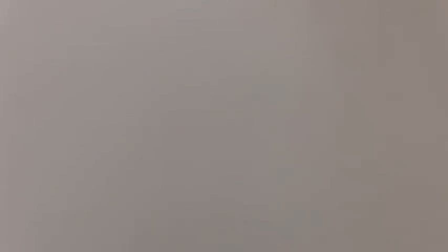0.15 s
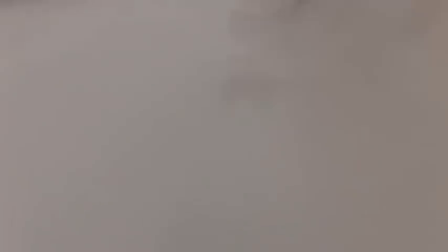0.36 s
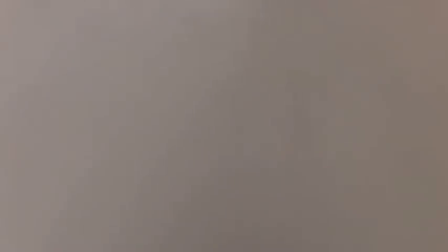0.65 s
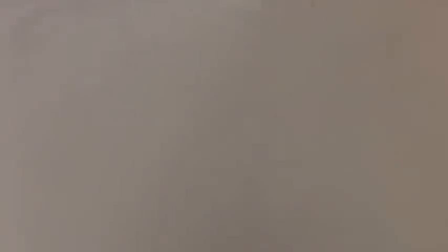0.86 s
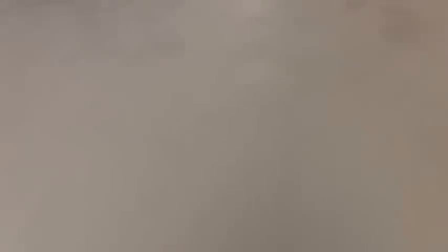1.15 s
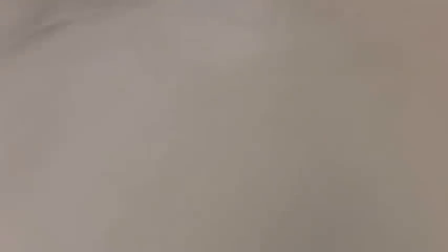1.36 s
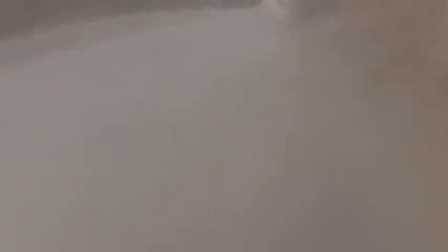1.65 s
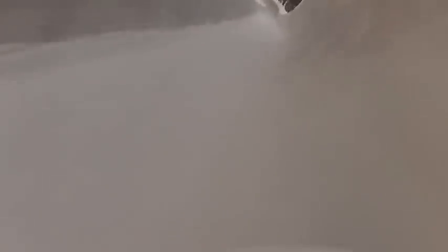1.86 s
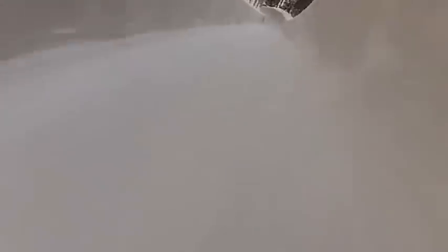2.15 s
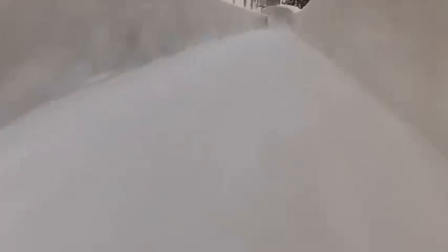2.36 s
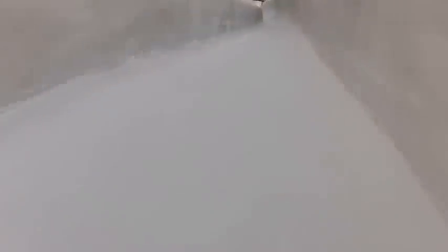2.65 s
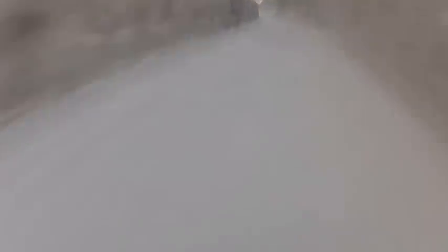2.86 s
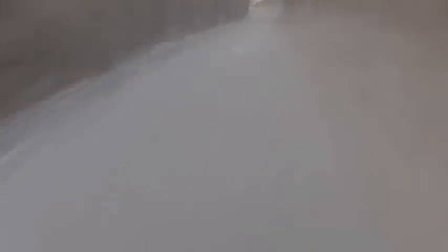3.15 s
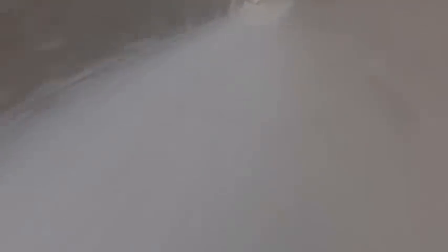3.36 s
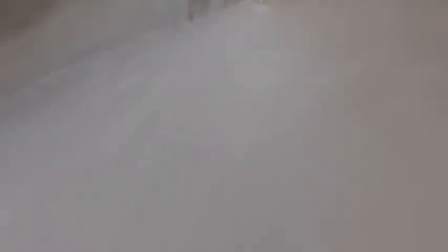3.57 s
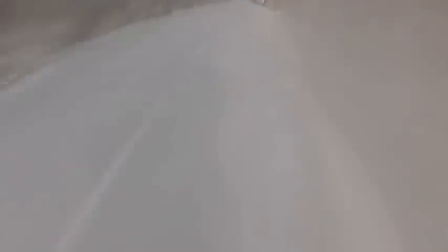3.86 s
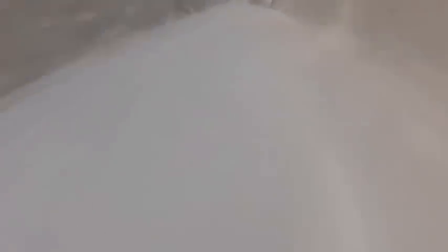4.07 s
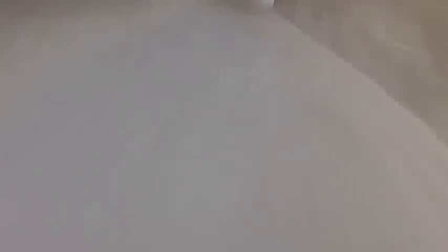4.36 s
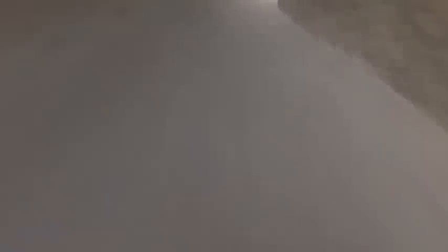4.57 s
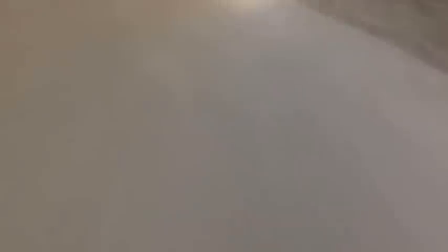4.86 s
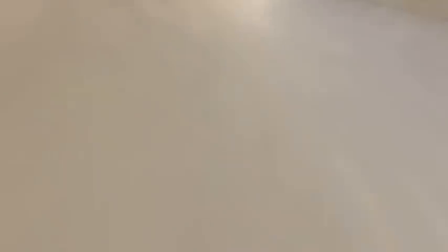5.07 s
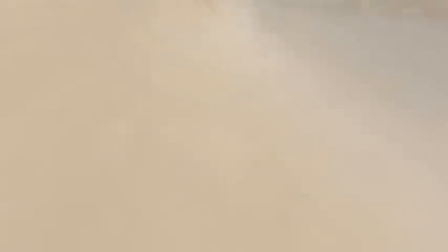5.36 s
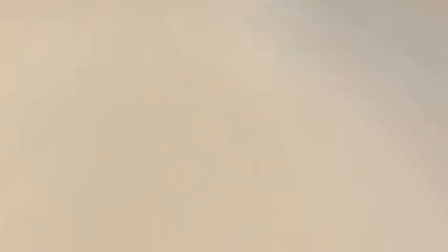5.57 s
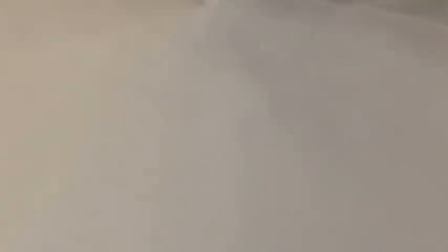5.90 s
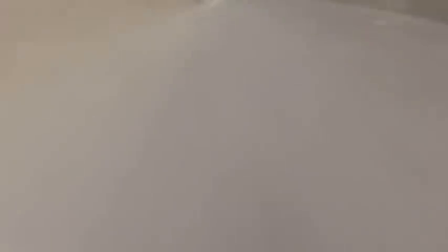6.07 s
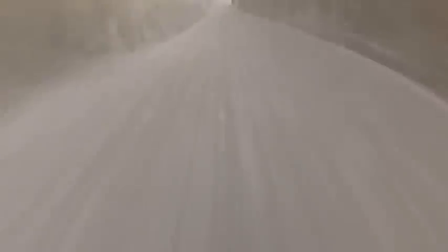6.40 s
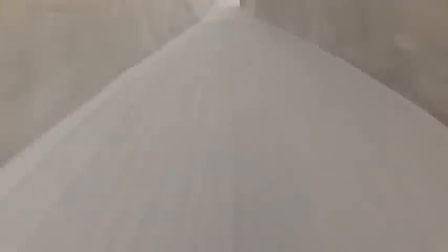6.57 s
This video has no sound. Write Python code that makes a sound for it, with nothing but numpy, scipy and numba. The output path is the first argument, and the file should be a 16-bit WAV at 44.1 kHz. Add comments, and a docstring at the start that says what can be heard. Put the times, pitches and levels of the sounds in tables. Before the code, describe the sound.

A sled runs fast on ice, heard dry and very close through its frame, centred. At 0 s a bump starts it, the scrape briefly held down, then loud: a dense, gritty, metallic rasp strongest around 2 kHz, with fluttering spray hiss. A double knock at 0.5 s has a very hard second hit; another hard thump lands at 1.0, a smaller one at 1.1. Deep rumble swells near 1.4, then knocks come at 1.7-1.8. A faint low groan passes around 2.2. From 2 to 5 s the scrape dominates, fullest near 3.8, with tiny bright ice ticks at 3.4, 4.5 and 6.2 and a weak bump at 4.2. Bumps return at 5.2, hard ones at 5.55-5.65, with groaning skids and the strongest rumble near 5.75. More thumps hit at 5.9, 6.2 and 6.4. The hardest blows distort and momentarily duck the scrape, which continues to the end at about 6.7.

```python
"""A bump and the harsh scrape of steel on ice open a sled run, taken by a camera fixed to the frame.
The runners crush ice grains and chatter, ringing the frame; skids in the turns make it groan.
Ruts make the shell rumble, ridges thump it and now and then a chip of ice ticks.
Everything arrives through the frame, alike in both channels.
The hardest thumps overload the camera, whose limiter ducks the scrape for a moment."""
import sys
import numpy as np
from scipy import signal
from scipy.fft import rfft, irfft
from scipy.io import wavfile
from scipy.ndimage import uniform_filter1d
from numba import njit

SR = 44100
rng = np.random.default_rng(int(sys.argv[2]) if len(sys.argv) > 2 else 0)


def store_pcm(level_fs):
    """Save levels as 16-bit WAV."""
    pcm = np.round(np.clip(level_fs, -1, 1) * 32767).astype(np.int16)
    wavfile.write(sys.argv[1], SR, np.atleast_2d(pcm).T)


N = 297234
T = np.arange(N) / SR
BINS = np.maximum(np.fft.rfftfreq(N, 1 / SR), 1)  # Hz, kept above zero

# broad colour of steel on ice: (frequency [Hz], level [dB])
STEEL_COLOUR = [(90, -25), (170, -13), (280, -12.5), (500, -14.5), (720, -19.5), (1050, -16.5),
                (1500, -8.5), (2100, -2.5), (2800, -7), (4200, -18.5), (5400, -20.5), (7500, -21),
                (9700, -18), (14500, -21.5)]
# resonances of runners and frame: (frequency [Hz], width [Hz], lift [dB])
FRAME_MODES = [(377, 71, 6.5), (909, 101, 8.5), (1275, 320, 8.5), (1780, 174, 3), (2265, 156, 3),
               (3133, 150, 4), (3710, 420, 5), (4510, 146, 6), (8310, 270, 5), (8970, 510, 4.5),
               (9780, 430, 6.5), (14300, 560, 6)]


def undb(db):
    """Decibels to gain."""
    return 10 ** (np.asarray(db) / 20)


def slope(points):
    """A (Hz, dB) outline on the frequency bins, straight over log frequency."""
    hz, db = np.transpose(points)
    return np.interp(np.log(BINS), np.log(hz), db)


def humps(modes):
    """Bell-shaped lifts or hollows in dB on the frequency bins."""
    return sum(db * .5 ** ((2 * (BINS - hz) / width) ** 2) for hz, width, db in modes)


def colour(x, db):
    """Causal filter with the given dB response, so that rings follow their blows."""
    # folding the cepstrum gives the minimum-phase response
    cepstrum = irfft(np.log(undb(db)), N)
    cepstrum[1:N // 2] *= 2
    cepstrum[N // 2 + 1:] = 0
    response = irfft(np.exp(rfft(cepstrum)), N)[:SR // 2]
    return signal.fftconvolve(x, response)[:N]


def unit(x, lo, hi):
    """Scale the whole sound so that its band from lo to hi Hz has rms 1."""
    band = rfft(x) * (BINS > lo) * (BINS < hi)
    return x / np.std(irfft(band, N))


def walk(rate):
    """Random levels held 1 / rate s and slewed; spread 1."""
    k = max(int(SR / rate), 2)
    steps = np.repeat(rng.standard_normal(N // k + 1), k)[:N]
    slewed = uniform_filter1d(steps, k)
    return slewed / np.std(slewed)


def decay(start_s, fall_s):
    """A sudden start that dies away exponentially, to 1/e in fall_s."""
    return (T > start_s) * np.exp(-np.minimum(np.abs(T - start_s) / fall_s, 50))


def runners(scrape_db, grain_db=1.5, grain_rate=6000, chatter_db=0.35, judder_db=0.5,
            sway_db=0.07, flicker_db=0.6):
    """Countless tiny ice fractures, bunched by the chattering, swaying runners, ring the frame."""
    # grain_rate: mean fractures per second
    falls = rng.random(N) < grain_rate / SR
    sizes = undb(grain_db * np.minimum(rng.exponential(size=N), 4))
    cracks = falls * rng.standard_normal(N) * sizes
    # smooth rubbing lies 3.5 dB above the cracks
    friction = cracks / np.std(cracks) + undb(3.5) * rng.standard_normal(N)
    pressure = undb(chatter_db * walk(170) + judder_db * walk(32) + sway_db * walk(12))
    steel = colour(friction * pressure, slope(STEEL_COLOUR) + humps(FRAME_MODES))
    steel = unit(steel, 1100, 4000)
    # the finest fractures throw spray, whose hiss comes and goes on its own
    spray = irfft(rfft(steel) / (1 + (5500 / BINS) ** 6), N)
    spray_db = -1.7  # relative to its share of the scrape
    spray_gain = undb(spray_db + flicker_db * walk(60))
    return (steel + spray * (spray_gain - 1)) * undb(scrape_db)


def rumble(shake_db, boom_hz=89, boom_width_hz=44, jolt_db=2.0, jolt_rate=18):
    """Ruts shake the sled in uneven jolts; the shell booms along, growing more slowly than the shaking."""
    # roughness of the track as it shakes the sled: (frequency [Hz], level [dB])
    ruts = [(8, -10.5), (22, 2.5), (45, -0.5), (70, 4), (100, -2.5), (140, -19.5), (250, -15.5), (600, -34)]
    jolts = undb(jolt_db * walk(jolt_rate))
    shake = unit(colour(rng.standard_normal(N) * jolts, slope(ruts)), 25, 130)
    detuning = (BINS - boom_hz ** 2 / BINS) / boom_width_hz
    boom = colour(rng.standard_normal(N) * jolts, -20 * np.log10(1 + detuning ** 2))
    # the boom is -27 dB when the shaking is -27.5 dB, and gains 0.27 dB per dB of shaking
    boom_db = -27 + 0.27 * (shake_db + 27.5)
    return shake * undb(shake_db) + boom / np.std(boom) * undb(boom_db)


def shove(start_s, length_ms):
    """A half-sine push of unit area."""
    pulse = np.sin(np.pi * np.clip((T - start_s) * 10 ** 3 / length_ms, 0, 1))
    return pulse / pulse.sum()


def thumps(rattle_s=0.0036, boom_top_hz=370, rattle_db=2, rattle_low_hz=1300, rattle_top_hz=1700):
    """Each bump lifts the shell and drops it, so that it booms; the frame rattles briefly at the contact."""
    # bumps in the track: (time [s], blow [dB], contact time [ms],
    # frame rattle relative to the blow, before the common rattle_db [dB])
    bumps = [(0.000, 3, 0.5, -19), (0.506, -4, 2, -25), (0.5292, 10.5, 1.8, -9.5), (1.0332, 7.5, 1.3, -11),
             (1.122, -1, 1.8, -13), (1.683, -1.5, 2.5, -17), (1.772, -5, 2.8, -20), (1.785, 4, 1.75, -13),
             (4.219, -14, 3.5, -22), (5.198, -4.5, 3.2, -21), (5.224, -7, 1.1, -11),
             (5.5516, 6.5, 1.3, -11), (5.621, 7.5, 5.6, -21), (5.646, 4, 1.5, -17), (5.931, -9, 2.3, -18),
             (5.943, 3.5, 1.5, -15), (6.1769, 7, 1.4, -15), (6.405, -3.5, 2.6, -14), (6.423, 8, 1.3, -12)]
    # modes that a bump rings in the shell: (frequency [Hz], level [dB], time to fall 60 dB [s])
    shell_modes = [(56, -13, 0.2), (95.2, -2, 0.1), (181, -10, 0.023), (304, -7.5, 0.027)]
    drop_ms, drop_db = 5.9, -5  # the runner drops back: length, strength relative to the blow
    push, contact = np.zeros(N), np.zeros(N)
    for s, db, contact_ms, frame_db in bumps:
        lift = shove(s, contact_ms)
        drop = undb(drop_db) * shove(s + contact_ms / 10 ** 3, drop_ms)
        push += undb(db) * (lift - drop)
        contact += undb(db + frame_db) * decay(s, rattle_s)
    t = T[:SR // 2]
    ring = sum(undb(db) * np.cos(2 * np.pi * hz * t) * np.exp(-np.log(1000) * t / t60)
               for hz, db, t60 in shell_modes)
    boom = signal.fftconvolve(push, ring)[:N]
    boom = irfft(rfft(boom) / (1 + (BINS / boom_top_hz) ** 6), N)
    band_loss = (1 + (BINS / rattle_top_hz) ** 4) * (1 + (rattle_low_hz / BINS) ** 2)
    frame = slope(STEEL_COLOUR) + humps(FRAME_MODES) - 10 * np.log10(band_loss)
    rattle = colour(contact * rng.standard_normal(N), frame)
    rattle /= np.sqrt(np.mean(undb(frame) ** 2))  # filter gain brought to rms 1
    return boom + undb(rattle_db) * rattle


def groan(rough_db=2, top_hz=1100):
    """Runners skidding sideways stir the frame's low resonances, swelling and fading with each skid."""
    # sideways skids in the turns: (middle [s], half length, down to 1/e [s], level [dB])
    skids = [(2.22, 0.25, -30.5), (5.1, 0.33, -31.5), (5.21, 0.021, -26), (5.8, 0.056, -25),
             (6.1, 0.27, -31.5)]
    # resonances of the groan: (frequency [Hz], width [Hz], lift [dB])
    groan_modes = [(356, 275, 21.5), (910, 170, 19.5)]
    load = sum(undb(db) * np.exp(-((T - s) / half) ** 2) for s, half, db in skids)
    skid = rng.standard_normal(N) * undb(rough_db * walk(40))
    frame = colour(skid, humps(groan_modes) - 10 * np.log10(1 + (BINS / top_hz) ** 4))
    return load * frame / np.std(frame)


def chips(snap_s=0.001):
    """Loose bits of ice burst with a short bright tick."""
    # ice chips snapping under a runner: (time [s], burst level before colouring [dB])
    snaps = [(3.43, -14), (4.484, -9), (4.534, -15), (6.242, -9)]
    burst = sum(undb(db) * decay(s, snap_s) for s, db in snaps)
    bright = slope([(500, -18), (2500, 3), (5500, 3), (9000, -3), (15000, -16)])
    return colour(burst * rng.standard_normal(N), bright)


def scene():
    """Everything reaches the camera through the frame, alike in both channels."""
    # how hard the runners bite along the run: (time [s], scrape level at 1.1-4 kHz [dB])
    bite = [(0, -19.5), (.52, -19.5), (.7, -18), (.79, -19), (.92, -18.5), (2.1, -17.5), (2.45, -18.8),
            (2.8, -17.5), (3.8, -16.4), (4.5, -18), (5.2, -19), (5.4, -17.5), (5.85, -19.5), (6.1, -17),
            (6.35, -19), (6.68, -17.5)]
    # deep shaking, strongest in the two banked turns: (time [s], level at 25-130 Hz [dB])
    shaking = [(.25, -29), (1.15, -26), (1.41, -19), (1.52, -28.5), (2.05, -24), (2.6, -36), (3.1, -33.5),
               (4.6, -29.5), (5.1, -26), (5.38, -29), (5.76, -17), (6.05, -24.5), (6.35, -23.5),
               (6.55, -31)]
    scrape_db = np.interp(T, *np.transpose(bite))
    shake_db = np.interp(T, *np.transpose(shaking))
    sled = runners(scrape_db) + rumble(shake_db) + thumps() + groan() + chips()
    return np.array([sled, sled])


@njit
def follow(over_db, attack, hold, fall_db, start_db):
    """Gain reduction that rises quickly, is held for some samples, then falls by fall_db a sample."""
    out, duck, wait = np.empty(len(over_db)), start_db, hold
    for i in range(len(over_db)):
        if over_db[i] > duck:
            duck, wait = duck + (over_db[i] - duck) * attack, hold
        elif wait > 0:
            wait -= 1
        else:
            duck = max(duck - fall_db, 0.)
        out[i] = duck
    return out


def record(dry, limit_db=1.05, attack_s=0.0011, hold_s=0.033, release_db_per_s=80,
           start_duck_db=7.0, lookahead_s=0.0011):
    """The port colours the sound, the limiter ducks under thumps, what is left clips, the top is cut."""
    # hollows of the camera's sound port: (frequency [Hz], width [Hz], depth as negative lift [dB])
    port = [(6002, 333, -20), (11976, 1216, -54)]
    heard = np.array([colour(channel, humps(port)) for channel in dry])
    level_db = 20 * np.log10(np.abs(heard).max(axis=0) + 1e-9)
    over_db = np.maximum(level_db - limit_db, 0)
    # the limiter is already down at first
    duck_db = follow(over_db, 1 / (attack_s * SR), float(hold_s * SR),
                     release_db_per_s / SR, float(start_duck_db))
    ducked = heard * undb(-np.interp(T + lookahead_s, T, duck_db))
    lowpass = signal.ellip(12, .1, 80, 15350, fs=SR, output="sos")  # ripple, stop dB; edge Hz
    return signal.sosfilt(lowpass, np.clip(ducked, -1, 1))


dry = scene()
out = record(dry)
store_pcm(out)
```